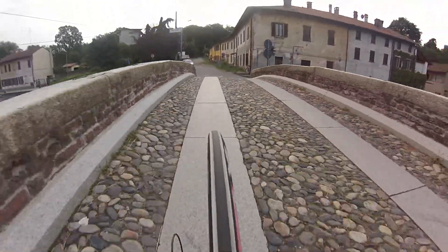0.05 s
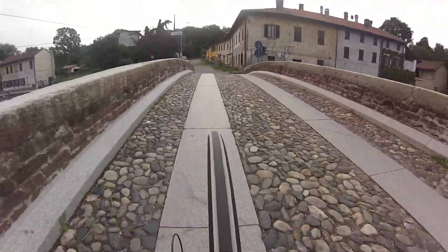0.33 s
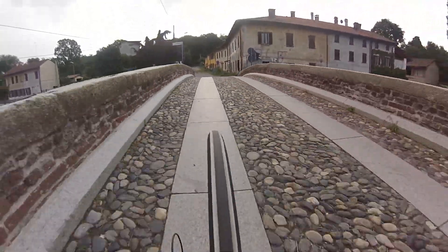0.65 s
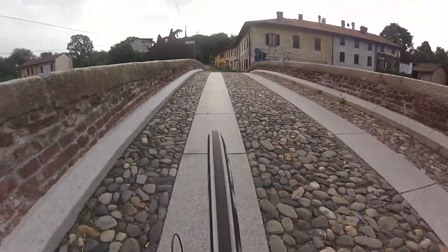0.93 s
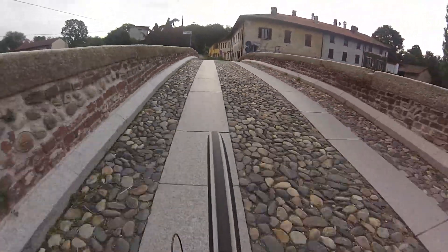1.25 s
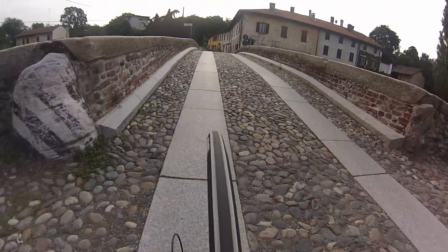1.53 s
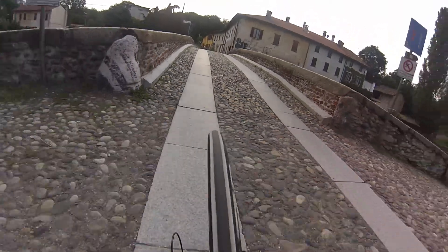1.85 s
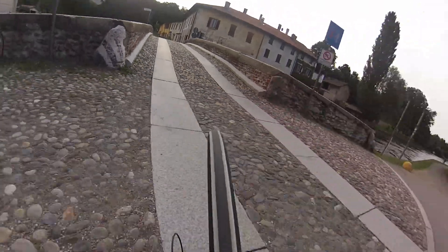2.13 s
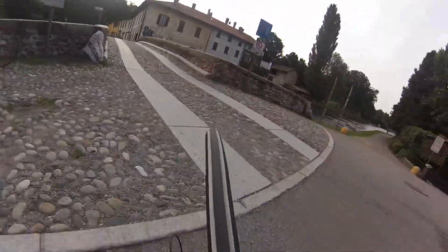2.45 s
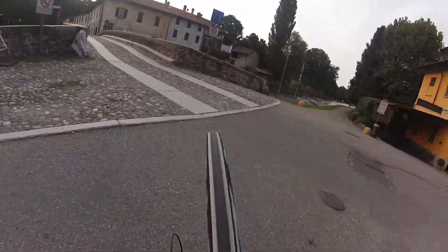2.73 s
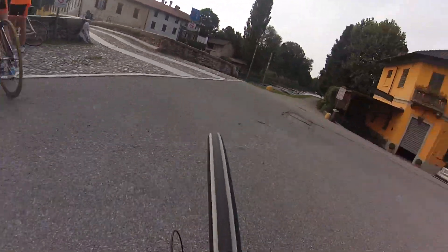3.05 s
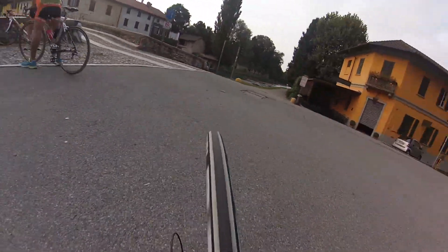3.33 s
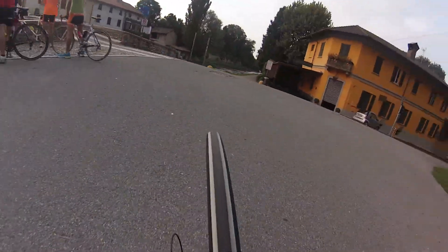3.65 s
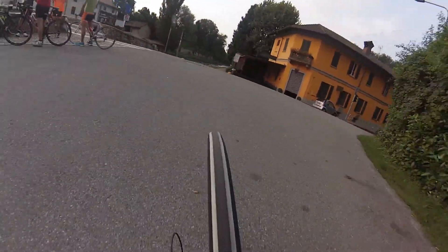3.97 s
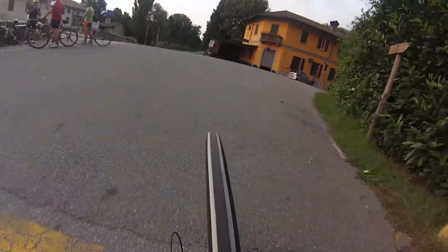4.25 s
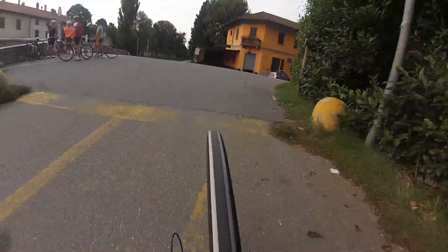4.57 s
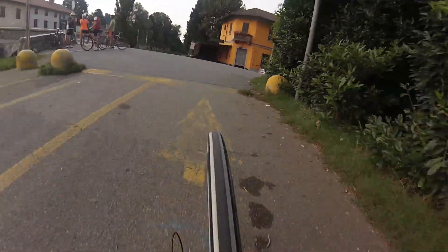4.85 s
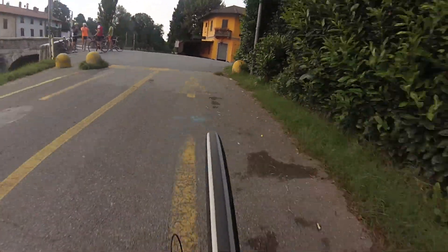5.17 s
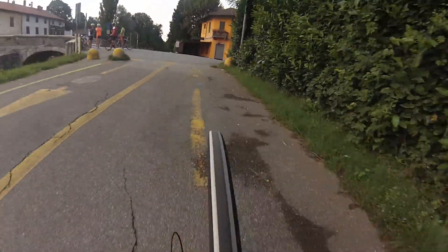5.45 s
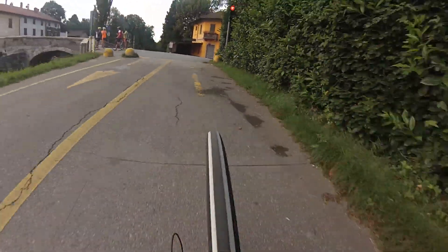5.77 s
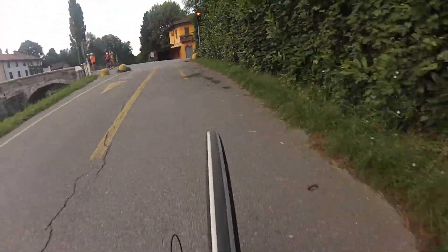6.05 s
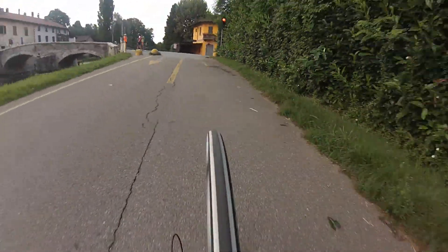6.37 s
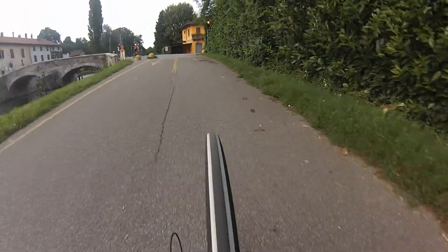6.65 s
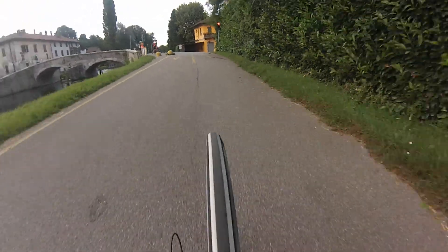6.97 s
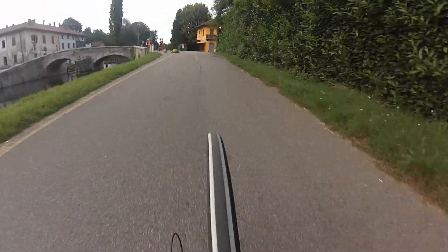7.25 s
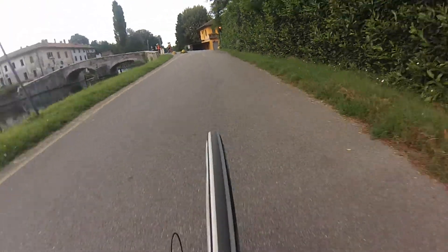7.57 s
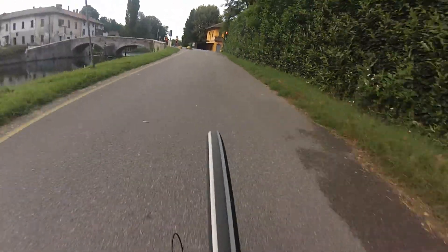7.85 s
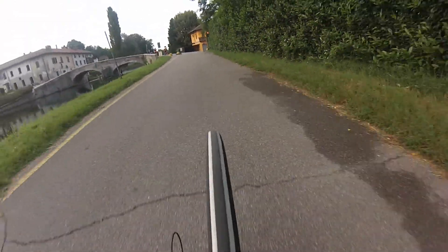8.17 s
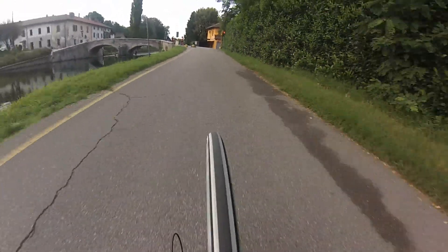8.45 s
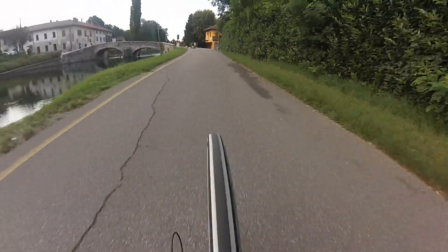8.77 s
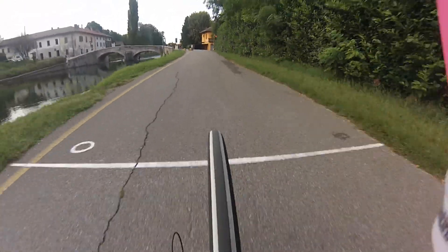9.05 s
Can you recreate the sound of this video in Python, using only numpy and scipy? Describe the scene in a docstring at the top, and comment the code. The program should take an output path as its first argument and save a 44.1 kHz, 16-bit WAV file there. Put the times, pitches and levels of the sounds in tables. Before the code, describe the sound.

A bicycle ride in blustery wind, with freewheel buzz, chain ticks, a few sharp clacks and faint tyre hiss under growing rumble.

```python
"""A bicycle ride in the wind

A bicycle coasts off a cobbled bridge, is pedalled up to speed on asphalt with a few gear changes, then
coasts again. Wind buffets a microphone on the frame in gusts and single swirls of air, called eddies.
The tyres hiss, the freewheel buzzes as its catches snap over its teeth, the frame knocks at the kerb,
and the chain ticks, clacks and pings on the cogs."""
import sys
import numpy as np
from scipy import signal
from scipy.fft import rfft, irfft
from scipy.io import wavfile
from scipy.ndimage import uniform_filter1d

SR = 44100
rng = np.random.default_rng(int(sys.argv[2]) if len(sys.argv) > 2 else 0)


def store_pcm(level_fs):
    """Save levels as 16-bit WAV."""
    pcm = np.round(np.clip(level_fs, -1, 1) * 32767).astype(np.int16)
    wavfile.write(sys.argv[1], SR, np.atleast_2d(pcm).T)


N = 410571


def from_db(db):
    """Turn decibels into a number to multiply a sound by."""
    return 10 ** (np.asarray(db) / 20)


def rms_one(x):
    """Scale a signal so that its average strength (rms) is 1."""
    return x / np.sqrt(np.mean(x ** 2) + 1e-20)


def curve(rows):
    """Join (seconds, value) points with straight lines, giving a value for every sample."""
    times, values = np.transpose(rows)
    return np.interp(np.arange(N) / SR, times, values)


def add(out, start_s, sound):
    """Mix a short sound in at a given time."""
    start = int(np.clip(round(start_s * SR), 0, N))
    out[start:start + len(sound)] += sound[:N - start]


def drift(hz):
    """A value that wanders at random around zero, at about this rate."""
    r = np.exp(-2 * np.pi * hz / SR)
    return rms_one(signal.lfilter([1], [1, -2 * r, r * r], rng.standard_normal(N + SR))[SR:])


def noise(spectrum):
    """Noise with a tone colour drawn through (Hz, dB) points, fading beyond the first and last."""
    hz, db = np.transpose(spectrum)
    f = np.maximum(np.arange(N // 2 + 1) * SR / N, 1)
    ends = np.minimum(f / hz[0], 1) ** 2 * np.minimum(hz[-1] / f, 1) ** 4
    colour = from_db(np.interp(np.log(f), np.log(hz), db))
    return rms_one(irfft(rfft(rng.standard_normal(N)) * ends * colour, N))


def dull(x, hz):
    """Gently turn down the treble above this frequency."""
    r = np.exp(-2 * np.pi * hz / SR)
    return signal.lfilter([1 - r], [1, -r], x + 1e-18)


def resonate(x, tones):
    """Let a signal ring an object's natural tones; every second tone is added upside down."""
    out = 0
    for k, (hz, width, db) in enumerate(tones):
        r = np.exp(-np.pi * width / SR)
        poles = [1, -2 * r * np.cos(2 * np.pi * hz / SR), r * r]
        ring = signal.lfilter([1, 0, -1], poles, x + 1e-18)
        out = out + (-1) ** k * from_db(db) * (1 - r * r) / 2 * ring
    return out


def ring_strength(tones):
    """How strongly an object answers one click; dividing by this keeps levels comparable."""
    return np.linalg.norm(resonate(signal.unit_impulse(SR // 10), tones))


def steady(x, seconds):
    """Even out loudness changes slower than this, keeping the faster flutter."""
    size = max(int(seconds * SR), 2)
    power = uniform_filter1d(uniform_filter1d(x * x, size), size)
    return x / np.sqrt(np.abs(power) + 1e-12)


def swell(start, length, rise_s, fall_s):
    """A loudness shape that rises to 1 by the start time, holds, then dies away."""
    t = np.arange(N) / SR
    span_s = np.array([start - 10 * rise_s, start + length + 10 * fall_s])
    near = slice(*np.clip(span_s * SR, 0, N).astype(int))
    age = t[near] - start
    out = np.zeros(N)
    out[near] = np.exp(np.minimum(age, 0) / rise_s - np.maximum(age - length, 0) / fall_s)
    return out


# The steady wind between gusts, growing with speed. Each row: time in seconds, level in dB.
AIRFLOW = [(0.0, -57), (0.55, -35), (1.0, -37), (1.7, -40), (2.2, -34.5), (2.85, -33), (3.02, -37.5),
           (3.3, -29.5), (3.85, -36.5), (4.25, -29.5), (4.75, -41.5), (5.1, -32.5), (5.85, -33.5),
           (6.4, -27.5), (7.2, -26), (8.6, -24.5), (9.31, -24)]
# Gusts. Each row: start in seconds, length in seconds, level in dB,
# brightness in dB (fine eddies compared with mid-sized ones).
GUSTS = [(0, 0.031, -28, -21.5), (0.107, 0.11, -22.5, -13.5), (0.26, 0.14, -30.5, -22),
         (0.458, 0.0061, -27.5, -20.5), (0.694, 0.0077, -31.5, -23), (0.828, 0.1, -28.5, -17.5),
         (1.608, 0.014, -24.5, -12.5), (2.321, 0.18, -30.5, -13), (2.687, 0.042, -23.5, -16),
         (2.764, 0.13, -36.5, -22), (3.106, 0.098, -29, -20.5), (3.33, 0.058, -26, -11.5),
         (3.481, 0.013, -31, -9.5), (3.61, 0.076, -28, -19.5), (3.675, 0.024, -31.5, -23),
         (4.002, 0.0058, -31, -25), (4.086, 0.12, -24, -15.5), (4.446, 0.074, -18.5, -11),
         (4.581, 0.073, -24, -16.5), (4.754, 0.038, -36, -21), (4.841, 0.0038, -25.0, -13),
         (4.913, 0.1, -26, -14.5), (5.227, 0.12, -21, -11.5), (5.531, 0.024, -28, -13.5),
         (5.618, 0.072, -30, -21), (5.834, 0.038, -40.5, -30.5), (5.963, 0.055, -22, -12),
         (6.066, 0.099, -25.5, -18.5), (6.183, 0.074, -22, -14.5), (6.359, 0.014, -18.5, -10),
         (6.526, 0.089, -21.5, -11), (6.664, 0.078, -26, -23), (6.805, 0.1, -22, -10.5),
         (6.941, 0.033, -20.5, -13), (7.028, 0.041, -26, -19.5), (7.127, 0.067, -23, -11),
         (7.218, 0.13, -19.5, -9.5), (7.405, 0.035, -22, -14), (7.487, 0.058, -20.5, -12.5),
         (7.61, 0.072, -21.5, -13.5), (7.716, 0.032, -21.5, -14), (7.84, 0.044, -19, -5),
         (7.922, 0.045, -19.5, -9), (8.064, 0.035, -21.5, -8.5), (8.136, 0.11, -22, -12),
         (8.276, 0.15, -22.5, -15), (8.448, 0.081, -22, -14), (8.603, 0.14, -28, -17.5),
         (8.772, 0.0082, -20, -8), (8.84, 0.12, -22.5, -13), (8.989, 0.13, -19, -2.5),
         (9.137, 0.17, -19.5, -0.5)]


def wind_strength(typical_db=-20, typical_bright_db=-12, arch_db=1):
    """How strong the large, mid-sized and fine eddies are as gusts add power to the steady wind."""
    flow_db = curve(AIRFLOW)
    rise_db = 1.73 * (flow_db + 30)  # smaller eddies grow faster than the flow itself
    large, mid, fine = from_db([flow_db, rise_db - 39, rise_db - 49]) ** 2
    for start, length, db, bright_db in GUSTS:
        shape = swell(start, length, rise_s=0.0096, fall_s=0.012)
        near = np.flatnonzero(shape)
        place = np.clip(2 * (near / SR - start) / length - 1, -1, 1)
        shape[near] *= from_db(arch_db * (.5 - place ** 2))  # strongest in the middle
        # loud, dull gusts rumble the most
        rumble_db = -17.5 + 1.42 * (db - typical_db) - (bright_db - typical_bright_db)
        large += (from_db(rumble_db) * swell(start, length, rise_s=0.021, fall_s=0.021)) ** 2
        mid += (from_db(db) * shape) ** 2
        fine += (from_db(db + bright_db) * shape ** 2) ** 2  # comes and goes in half the time
    return np.sqrt([large, mid, fine])


# The tone colours of large, mid-sized and fine eddies. Each row: frequency in Hz, relative level in dB.
RUMBLE_COLOUR = [(12, -22), (25, -6), (50, -2), (90, -4.5), (140, -9), (220, -22.5)]
WHOOSH_COLOUR = [(90, -15), (160, 4), (300, -1), (500, -9), (700, -14.5), (1100, -30)]
RUSTLE_COLOUR = [(450, 6), (750, 4), (1100, -0.5), (1600, -9.5), (2400, -20.5), (4000, -31.5), (7000, -50),
                 (14000, -93)]
# The bursts merge into a roar at speed. Each row: time in seconds, burstiness from 0 to 1.
BURSTINESS = [(0, 0.74), (8.9, 0.76), (9.02, 0.44), (9.31, 0.26)]


def wind(large, mid, fine):
    """Churning air hits the microphone in bursts; the smaller the eddies, the burstier they sound."""
    flutter = 1.27 * drift(hz=34.7) + 0.9 * drift(hz=108)
    bursts = curve(BURSTINESS) * 2 * np.tanh(flutter / 2)
    rumble = steady(noise(RUMBLE_COLOUR) * from_db(4 * bursts), seconds=0.092)
    whoosh = steady(noise(WHOOSH_COLOUR) * from_db(7 * bursts), seconds=0.048)
    rustle = steady(noise(RUSTLE_COLOUR) * from_db(10 * bursts), seconds=0.046)
    return large * rumble + from_db(1.5) * mid * whoosh + from_db(0.5) * fine * rustle


def shed_eddies(mid, fine, per_s=14, middle_hz=300):
    """List small eddies at random moments, as strong as the wind that sheds them (rows as below)."""
    gaps, sizes, pitches = rng.random((400, 3)).T
    times = np.cumsum(-np.log(1 - gaps)) / per_s
    samples = (times[times * SR < N] * SR).astype(int)
    rows = []
    for i, size, pitch in zip(samples, sizes, pitches):
        slap_db = 20 * np.log10(mid[i] * 2 * size) + 4.5
        crack_db = 20 * np.log10(fine[i] * 2 * size) - 0.5
        rows.append((i / SR, slap_db, middle_hz * 2 ** (pitch - .5), crack_db))
    return rows


# The hardest eddies. Each row: time in seconds, relative slap level in dB,
# quickness in Hz (higher gives a shorter slap), relative crack level in dB.
HARD_EDDIES = [(0.698, -9.5, 309, -39), (1.62, -13, 228, -57), (2.695, -14.5, 436, -29),
               (3.114, -13, 312, -25.5), (3.657, -14, 340, -35), (4.004, -12, 223, -43),
               (4.083, -20, 365, -50), (4.137, -8.5, 252, -25.5), (4.485, -3.5, 475, -40),
               (4.501, -20, 320, -25), (4.911, -7.5, 337, -19), (4.962, 2, 328, -16.5),
               (5.025, -8, 250, -36), (5.315, -8, 284, -40), (5.671, -7, 199, -29.5),
               (5.977, -2, 327, -20.5), (6.089, -7, 305, -27), (6.222, -17, 308, -23.5),
               (6.496, -4.5, 242, -26), (6.547, -5, 327, -23), (6.696, -7, 370, -31),
               (6.78, -7.5, 248, -26), (6.81, -7, 300, -25.5), (6.886, -3, 300, -22.5),
               (7.175, -6, 263, -38), (7.249, -7, 218, -22.5), (7.309, -12, 290, -20),
               (7.514, -4, 464, -34), (7.557, -12, 277, -22.5), (7.83, -4.5, 262, -28),
               (7.864, -0.5, 342, -15.5), (7.948, -20, 298, -24), (8.147, -6.5, 370, -29),
               (8.349, -5, 390, -28), (8.536, -1.5, 226, -18), (8.774, -4.5, 240, -18),
               (8.844, -6, 290, -22), (8.923, -6, 473, -18), (8.981, -6.5, 340, -18.5),
               (9.294, -5, 700, -19)]
# The tone colour of an eddy breaking up. Each row: frequency in Hz, relative level in dB.
CRACK_COLOUR = [(700, 15), (1300, 4), (2000, -4), (3200, -15), (4500, -24), (7000, -30), (14000, -40)]


def eddy_slaps(mid, fine, core_width=1.78, crack_s=0.00075):
    """An eddy crosses the microphone: one lopsided swing of pressure, and a crack as its core breaks."""
    rows = list(HARD_EDDIES) + shed_eddies(mid, fine)
    slaps, cracks = np.zeros(N), np.zeros(N)
    t = np.arange(-SR // 40, SR // 40) / SR
    breakup = steady(noise(CRACK_COLOUR), seconds=0.0053)
    skews = rng.normal(np.pi, 1, len(rows))
    for (at, slap_db, hz, crack_db), skew in zip(rows, skews):
        passage = 2 * np.pi * hz * t / core_width
        swing = np.real(np.exp(1j * skew) / (1 - 1j * passage) ** 2) * np.hanning(len(t))
        add(slaps, at + t[0], from_db(slap_db + 4.5) * swing)
        add(cracks, at + t[0], from_db(crack_db + 6) / np.cosh(t / crack_s))
    return slaps + cracks * breakup


# The two spells of coasting. Each row: time in seconds, freewheel teeth passing per second.
FIRST_COAST = [(0.0, 80), (0.23, 76), (0.62, 68.7), (1.17, 75.3), (1.5, 69), (1.69, 56), (1.91, 55.7),
               (2.18, 83), (2.34, 75)]
LAST_COAST = [(8.47, 110), (8.52, 184), (8.58, 184), (8.76, 115), (8.94, 170), (9.1, 144), (9.31, 146)]
# How hard the freewheel's catches snap down. Each row: time in seconds, relative level in dB.
CATCH_FORCE = [(0, -43.5), (1.2, -43.5), (1.7, -44), (2.2, -45), (2.34, -46.5), (8.47, -44), (8.53, -48),
               (8.56, -60), (8.66, -46), (8.8, -50.5), (9.0, -51), (9.31, -53.5)]
# The natural tones of hub and wheel. Each row: frequency in Hz, width in Hz, relative level in dB.
HUB_TONES = [(1817, 98, 5), (2050, 146, 4), (2430, 68, -2.5), (2620, 85, -1), (2840, 140, -2.5),
             (3230, 147, 2), (4150, 167, -4), (4900, 640, -18.5), (8300, 430, -9.5), (9070, 430, -10),
             (10440, 1400, -14.5), (12220, 410, -7.5), (12520, 450, -6.5), (15000, 1600, -27)]


def freewheel(coast, thin_hz, teeth_per_turn=30, wobble=.025, chatter_s=.004, alike=0.51, uneven_db=1.53):
    """At every tooth, small catches snap down and chatter, much the same each time, ringing the hub."""
    times, teeth_per_s = np.transpose(coast)
    t = np.arange(times[0], times[-1], 1 / SR)
    rate = np.interp(t, times, teeth_per_s)
    turns = np.cumsum(rate) / SR / teeth_per_turn
    rate *= 1 + wobble * np.sin(2 * np.pi * turns)  # the toothed ring is slightly out of round
    teeth = np.floor(np.cumsum(rate) / SR)
    fade = np.exp(-np.arange(SR // 40) / SR / chatter_s)
    # the part of the chatter that repeats is equally strong at all frequencies
    phases = np.angle(rfft(rng.standard_normal(len(fade)) * fade))
    repeated = irfft(np.exp(1j * phases), len(fade)) * np.linalg.norm(fade)
    clicks = np.zeros(N)
    for at in t[np.diff(teeth, prepend=-1) > 0]:
        fresh = rng.standard_normal(len(fade)) * fade
        chatter = np.sqrt(alike) * repeated + np.sqrt(1 - alike) * fresh
        add(clicks, at, from_db(uneven_db * rng.standard_normal()) * chatter)
    thinned = signal.lfilter(*signal.butter(1, thin_hz, "high", fs=SR), clicks + 1e-18)
    return from_db(curve(CATCH_FORCE) + 7.5) * resonate(thinned, HUB_TONES) / ring_strength(HUB_TONES)


# The tone colour of tyres on the road. Each row: frequency in Hz, relative level in dB.
TYRE_COLOUR = [(170, 12.5), (330, 2.5), (450, -5), (680, -5.5), (850, -0.5), (990, -7), (1130, -2),
               (1550, -12.5), (2000, -10), (2700, -19), (4100, -17.5), (5300, -29.5), (6400, -24.5),
               (8000, -33.5), (15000, -39)]
# How loudly they roll. Each row: time in seconds, relative level in dB.
ROLLING_LEVEL = [(0, -46), (1.8, -48), (2.4, -44.5), (3.0, -48.5), (3.8, -49), (5.1, -44.5), (5.8, -46.5),
                 (7.0, -46), (9.31, -45.5)]
# The natural tones of frame and gears. Each row: frequency in Hz, width in Hz, relative level in dB.
FRAME_TONES = [(996, 200, 6.5), (1434, 190, 3), (1897, 220, 3), (2700, 410, -1.5), (3170, 310, 1.5),
               (4140, 200, -0.5), (4680, 230, -5.5), (6300, 2200, -16.5), (8950, 750, -12.5),
               (11000, 620, -16.5), (13500, 1500, -18.5)]


def tyres(grain_db=3.0, hum_db=-13.0):
    """The tread hisses over the grain of the road, and the frame hums along."""
    road = dull(rng.standard_normal(N), hz=1500)
    hum = from_db(hum_db) * rms_one(resonate(road, FRAME_TONES))
    hiss = noise(TYRE_COLOUR)
    level_db = curve(ROLLING_LEVEL) - 0.5 + grain_db * drift(hz=29)
    return from_db(level_db) * (hiss + hum)


# Grit under a tyre. Each row: time in seconds, peak level in dB.
GRIT = [(1.378, -20)]
# The tones of a chain link's tick, also used for grit.
# Each row: frequency in Hz, width in Hz, relative level in dB.
TICK_TONES = [(4100, 1560, 0.5), (7700, 750, -2), (9900, 1560, -1.5), (14500, 1200, -25)]


def grit(fade_s=0.00088):
    """A grain of grit snaps out from under the tyre with a sharp crack."""
    out, t = np.zeros(N), np.arange(SR // 100) / SR
    for at, db in GRIT:
        crack = resonate(rng.standard_normal(len(t)) * np.exp(-t / fade_s), TICK_TONES)
        add(out, at, from_db(db) * crack / np.abs(crack).max())
    return out


# Clacks from gear changes, the kerb, and the freewheel starting up as pedalling stops. Each row:
# start in seconds, level in dB, the rattle's fade time in seconds, hardness in Hz (higher is brighter).
CLACKS = [(2.165, -33, 0.0048, 9000), (2.246, -26.5, 0.0021, 9000), (2.257, -27, 0.002, 9000),
          (2.378, -27.5, 0.0083, 12000), (2.519, -21, 0.0053, 1200), (2.597, -37, 0.0027, 9000),
          (3.085, -32.5, 0.0033, 9000), (3.246, -39, 0.0039, 12000), (3.279, -37.5, 0.013, 12000),
          (3.302, -20, 0.0079, 9000), (5.247, -33.5, 0.0044, 9000), (5.293, -30, 0.0062, 12000),
          (5.348, -36, 0.013, 12000), (5.437, -25.5, 0.018, 9000), (5.478, -36, 0.004, 9000),
          (8.473, -37, 0.0035, 12000), (8.529, -32, 0.0041, 12000)]


def clacks(shiver_db=-17, shiver_s=0.043):
    """Each clack is a short, dense rattle, and the frame shivers after it, duller."""
    blows, t = np.zeros(N), np.arange(SR // 4) / SR
    for at, db, fade_s, hard_hz in CLACKS:
        rattle = rng.standard_normal(len(t)) * np.exp(-t / fade_s)
        shiver = dull(rng.standard_normal(len(t)) * np.exp(-t / shiver_s), hz=5000)
        add(blows, at, from_db(db) * dull(rattle + from_db(shiver_db) * shiver, hard_hz))
    return resonate(blows, FRAME_TONES) / ring_strength(FRAME_TONES)


# The chain runs askew and rubs the cogs.
# Each row: start in seconds, length in seconds, relative level in dB.
CHAIN_RUBS = [(2.282, 0.31, -55.5), (2.657, 0.064, -59.5), (2.865, 0.29, -59), (3.47, 0.036, -65),
              (3.562, 0.16, -70.5), (4.132, 0.12, -61), (4.29, 0.1, -58.5), (4.625, 0.18, -65.5),
              (4.875, 0.1, -67), (5.155, 0.37, -63), (5.92, 0.055, -70), (6.126, 0.1, -64),
              (6.31, 0.098, -60.5), (6.667, 0.045, -57), (6.8, 0.19, -63), (7.066, 0.18, -65),
              (7.38, 0.18, -64.5), (7.71, 0.12, -62), (8.105, 0.08, -57), (8.217, 0.33, -66)]
# The hardest snaps of the links. Each row: time in seconds, level in dB.
LINK_SNAPS = [(2.4865, -32), (2.6983, -37), (2.9078, -39), (4.319, -38), (4.356, -44), (4.7755, -37),
              (5.9385, -40.5), (7.228, -34.5)]


def chain(from_s=2.3, to_s=8.47, links_per_s=54, loose_per_s=110, uneven_db=4.5, scuff_s=0.00076):
    """Links scuff onto the teeth, harder where the chain rubs; loose ones tick between and a few snap."""
    t = np.arange(N) / SR
    force = from_db(-73.5) * ((t > from_s) & (t < to_s))  # faint while the chain runs freely
    for start, length, db in CHAIN_RUBS:
        rub = from_db(db + 3) * swell(start, length, rise_s=0.017, fall_s=0.017)
        force = np.maximum(force, rub)
    links_passed = np.floor(np.cumsum(links_per_s * (1 + .1 * drift(hz=20))) / SR)
    seated = np.diff(links_passed, prepend=0) > 0
    loose = rng.random(N) < loose_per_s / SR
    ticks = (seated + from_db(-9) * loose) * from_db(uneven_db * rng.standard_normal(N))
    snaps = np.zeros(N)
    for at, db in LINK_SNAPS:
        add(snaps, at, from_db([db]))
    # each contact becomes a tiny, fading burst of noise
    fades = signal.lfilter([1], [1, -np.exp(-1 / (scuff_s * SR))], np.array([ticks, snaps]) + 1e-18)
    ticking, snapping = resonate(fades * rng.standard_normal(N), TICK_TONES) / ring_strength(TICK_TONES)
    return force * steady(ticking, seconds=0.07) + snapping


# The clearest pings of a cog. Each row: start in seconds, level in dB.
COG_PINGS = [(2.356, -48), (2.383, -47), (2.465, -49), (2.533, -45), (2.842, -49), (3.045, -51),
             (3.128, -47), (3.348, -45), (3.361, -41), (4.236, -48), (4.305, -47), (4.927, -46),
             (5.322, -42), (5.405, -46), (6.372, -44)]
# The cog's natural tones. Each row: frequency in Hz, relative level in dB, seconds to fade by 60 dB.
COG_TONES = [(4960, -8, .08), (12060, -9.5, .055), (12190, -11.5, .05)]


def cog_pings(rise_s=0.00065, uneven_db=3.4):
    """A thin steel cog rings briefly when the chain brushes it."""
    out, t = np.zeros(N), np.arange(SR // 8) / SR
    onset = 1 - np.exp(-t / rise_s)
    for at, db in COG_PINGS:
        for hz, tone_db, fade_s in COG_TONES:
            level_db = db + tone_db + rng.normal(0, uneven_db) - 60 * t / fade_s
            add(out, at, onset * from_db(level_db) * np.sin(2 * np.pi * hz * t))
    return out


def scene():
    """Mix the bicycle and the wind into one channel, all close by and in the open air."""
    # the last coast's faster teeth flick the catches more lightly and lose the low ring
    coasting = freewheel(FIRST_COAST, thin_hz=200) + freewheel(LAST_COAST, thin_hz=2640)
    bicycle = coasting + chain() + cog_pings() + clacks() + tyres() + grit()
    large, mid, fine = wind_strength()
    return (bicycle + wind(large, mid, fine) + eddy_slaps(mid, fine))[None]


def record(dry):
    """The hardest slaps overload and are rounded off; the highest treble is cut."""
    cutoff_hz = 15700
    rounded = dry / (1 + dry ** 6) ** (1 / 6)
    return signal.sosfilt(signal.ellip(10, .2, 90, cutoff_hz, fs=SR, output="sos"), rounded)


dry = scene()
out = record(dry)
store_pcm(out)
```